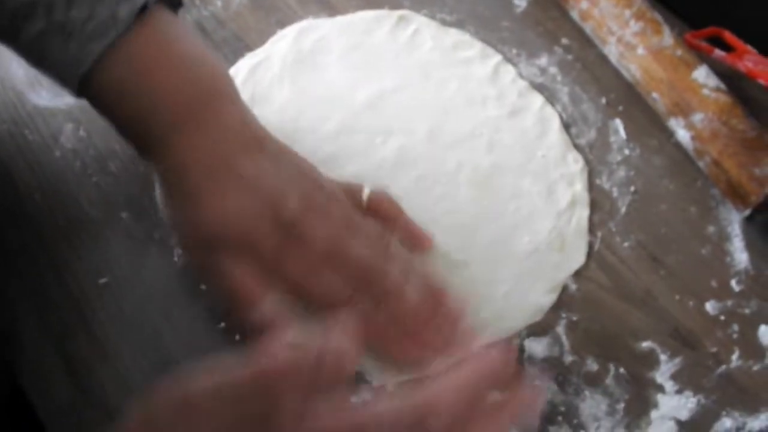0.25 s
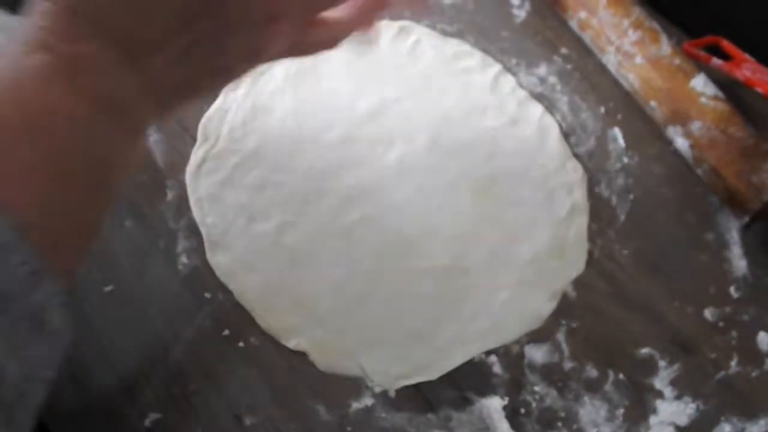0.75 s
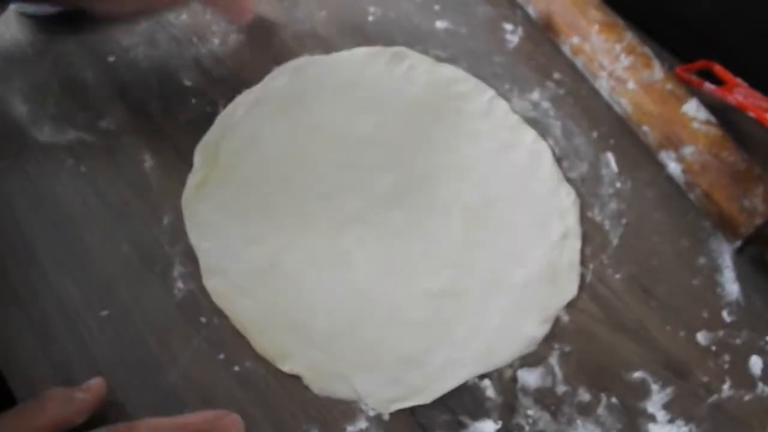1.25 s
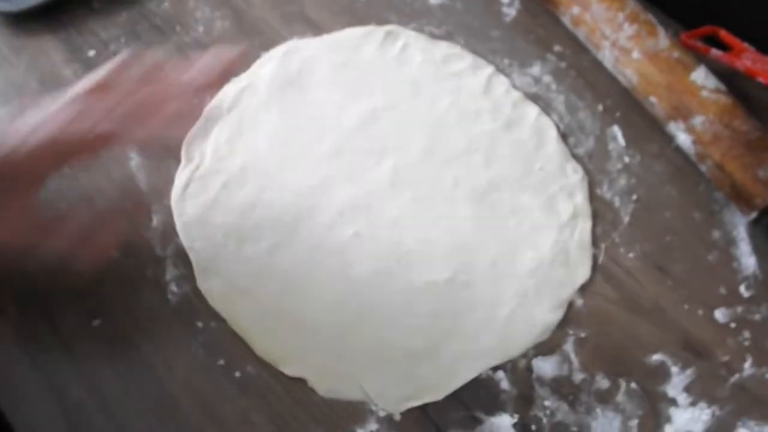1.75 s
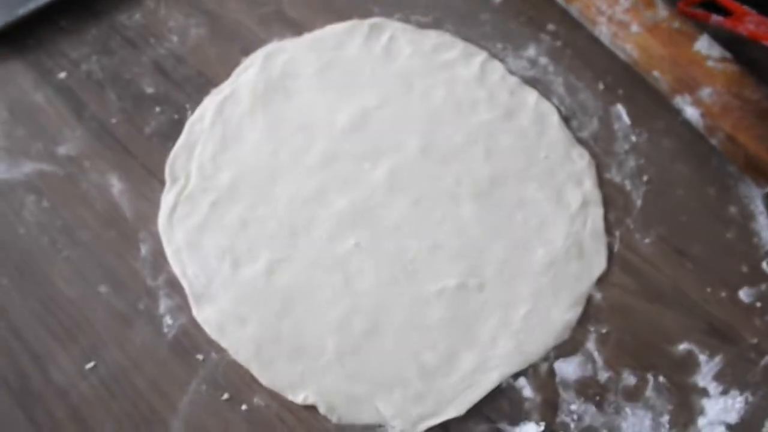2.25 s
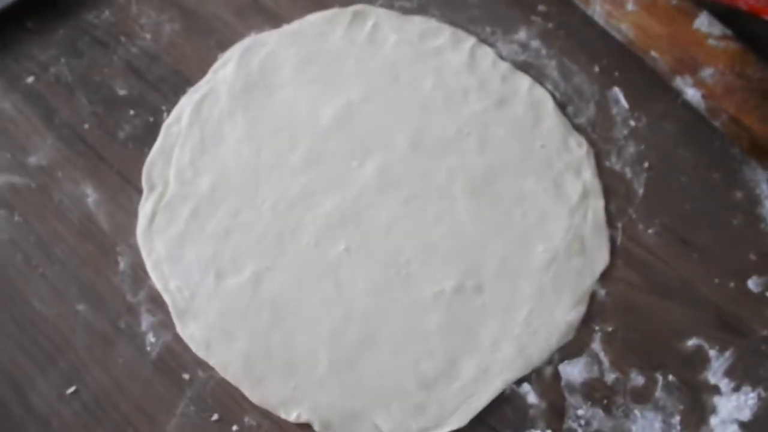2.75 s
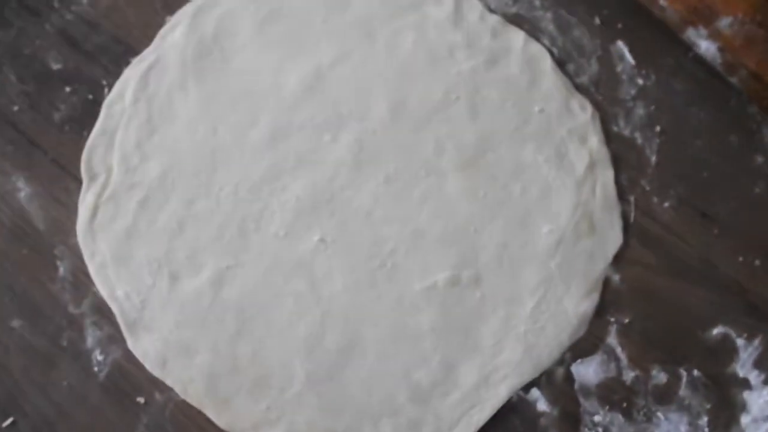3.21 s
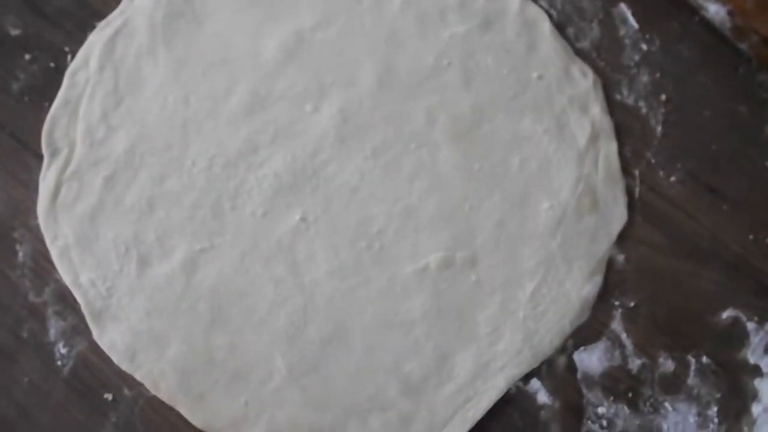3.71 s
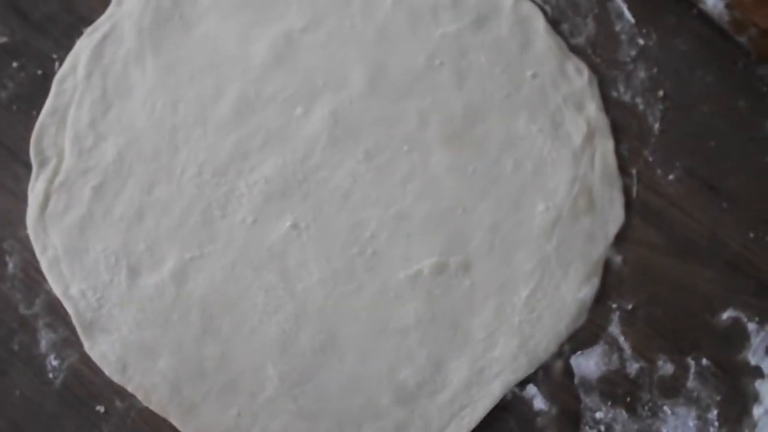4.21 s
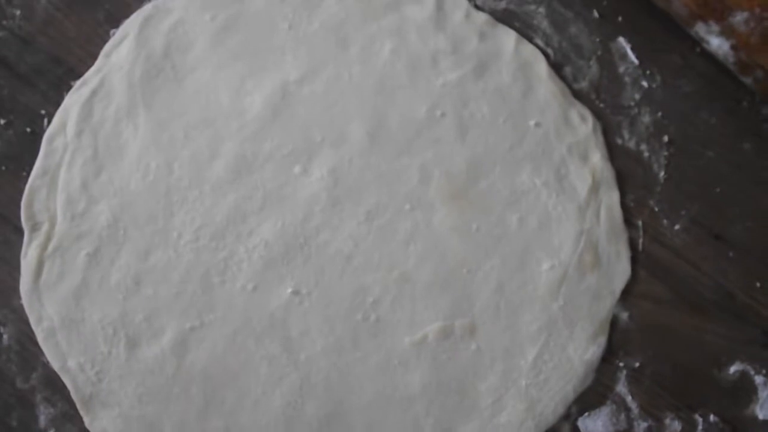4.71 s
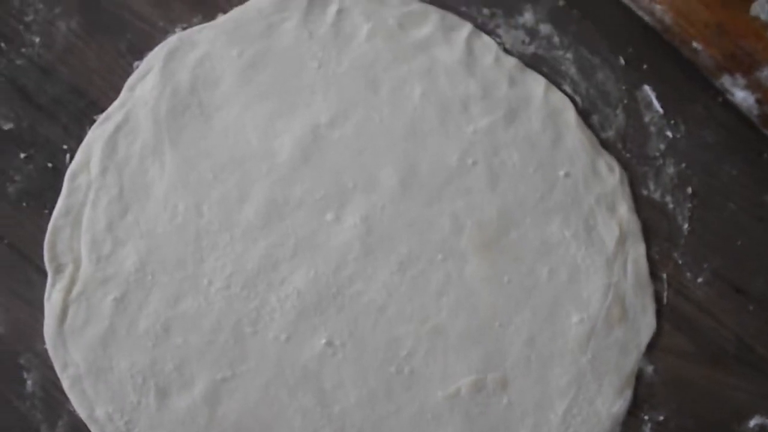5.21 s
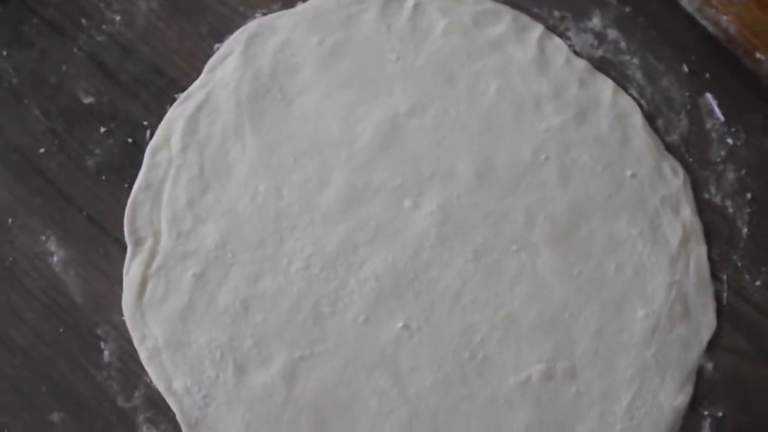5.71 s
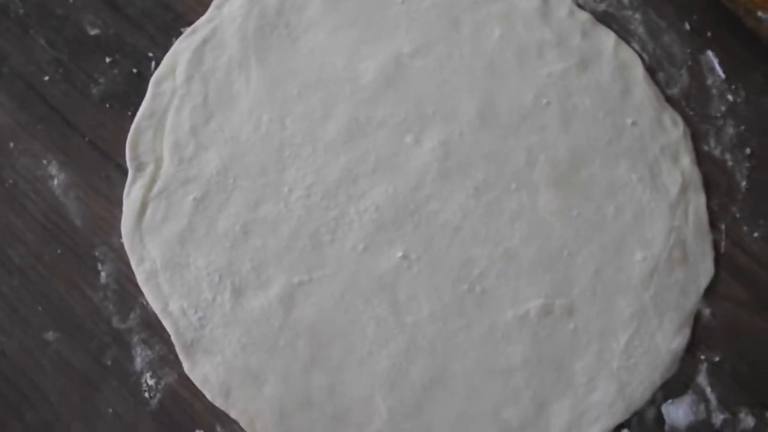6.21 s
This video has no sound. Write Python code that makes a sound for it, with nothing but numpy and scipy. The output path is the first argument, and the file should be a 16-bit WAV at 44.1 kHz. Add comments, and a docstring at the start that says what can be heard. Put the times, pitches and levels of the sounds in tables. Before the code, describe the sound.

One deep, muffled dough pat opens, followed by two brushing palm swishes, a bright clap and a faint second pat. The rest is mostly quiet: cloth rustling, light bumps and rubs on the camera body, tiny squeaks and short low motor pulses heard through the case. A very sharp click rattles at about six seconds. Close, nearly mono microphone, short dull room tail, low rumble and hum.

```python
"""A palm pats dough on a wooden board, the hands brush off flour and clap once, and a softer pat follows.
Sleeves rustle, and fingers bump, slide and squeak on a hand-held camera whose lens motor steps in short runs.
Near the end come a sharp, chattering click and a scrape on the case, over quiet kitchen air, rumble and hum.
Booms and clicks are fading sine waves; rubbing is shaped noise, mostly strongest near 3 kHz like the clicks."""
import sys
import numpy as np
from scipy import signal
from scipy.fft import rfft, irfft
from scipy.io import wavfile

SR = 44100
rng = np.random.default_rng(int(sys.argv[2]) if len(sys.argv) > 2 else 0)


def dump(signal):
    """Clip the signal to [-1, 1] and save it as 16-bit WAV at the path in sys.argv[1]."""
    limited = np.clip(np.atleast_2d(signal).T, -1, 1)
    pcm = np.round(limited * 32767).astype(np.int16)
    wavfile.write(sys.argv[1], SR, pcm)


N = 284884
TIME = np.arange(N) / SR  # seconds

# Pats on the dough. Each row: start in seconds, boom level in dB, ring time as a factor,
# skin slap in dB before doubling, squash of the dough in dB.
PATS = [(0.0431, -8, 1.0, -30, -30.5), (1.102, -28, 0.75, -31, -30)]
# Ways the board and table vibrate. Each row: pitch in Hz, level within the boom in dB,
# time to fade by 60 dB in seconds before the pat's ring factor.
BOARD_MODES = [(46, -22, .2), (72, 0, 0.19), (75.3, -13, 0.55), (96, -8.5, 0.19), (120.4, -14, 0.34),
               (146, -29, 0.11), (312, -25, .15)]
SQUASH_HZ, SQUASH_DECAY_S = 255, 0.026

# Floury palms sliding over each other. Each row: time of the firmest contact in seconds, level in dB,
# build-up in seconds, fade in seconds.
SWIPES = [(0.329, -37.5, 0.0068, 0.0074), (.366, -31.5, 0.011, 0.013), (.479, -15.5, 0.031, 0.03),
          (0.527, -17, 0.016, .025), (0.771, -25, 0.0081, 0.015), (.805, -31.5, 0.012, .042)]

# Claps and clicks. Each row: start in seconds, port ring in dB, bright crack in dB, dull knock in dB,
# ring time as a factor.
CLICKS = [(0.7712, -1, -15, -11, 0.26), (1.215, -40, -34, -60, 0.55), (1.2618, -21, -39, -39, 0.62),
          (1.796, -20, -42, -25.5, 0.44), (6.009, 5, -14.5, -30, 1.12)]
# Chatter of the last click. Each row: delay after it in seconds, port ring in dB.
REBOUNDS = [(.004, -5), (.008, -5), (.013, -4)]
REBOUND_CRACK_DB, REBOUND_KNOCK_DB, REBOUND_RING_FACTOR = -23.5, -31, 1.9
PORT_HZ, PORT_T60_S = 3158, 0.012  # microphone port; each click's ring factor scales the fade
UPPER_PORT_HZ = 4560

# Arm movements that rustle the sleeves. Each row: start in seconds, length in seconds, level in dB.
ARM_MOVES = [(.89, 0.53, -44), (1.44, 0.906, -41.5), (1.85, 0.13, -39), (2.4, 0.21, -41.5),
             (2.74, 0.036, -37), (2.92, 0.28, -42), (3.52, 0.32, -40), (3.86, 0.35, -49), (4.02, 0.26, -38),
             (4.24, 0.58, -31), (4.44, 0.066, -27.5), (4.82, 0.65, -43.5), (5.05, .12, -36),
             (5.47, 0.75, -36), (6.33, 0.22, -38), (6.44, 0.091, -31.5)]
ARM_START_S, ARM_STOP_S = 0.014, 0.02

# Fingers sliding on the camera. Each row: start in seconds, length in seconds, hiss in dB,
# case rumble in dB, top of the rumble in Hz.
SCUFFS = [(2.155, .092, -26, -32, 478), (2.494, 0.08, -31, -44.5, 396), (3.029, 0.12, -29, -43.5, 1050),
          (3.347, .075, -38.5, -49, 500), (3.519, .11, -35, -48.5, 413), (3.784, 0.038, -35.5, -51.5, 1500),
          (4.017, 0.11, -29, -63, 2200), (6.036, 0.14, -24.5, -32.5, 2080),
          (6.107, 0.089, -25.5, -34.5, 1910)]
SCUFF_RISE_SHARE = 0.23  # share of the length

# Fingers landing on the camera. Each row: start in seconds, hiss in dB, case rumble in dB,
# top of the rumble in Hz, decay in seconds.
BUMPS = [(1.262, -43, -45, 2800, .012), (1.309, -35.5, -41, 400, 0.023), (1.498, -40, -33, 1360, 0.039),
         (1.794, -26.5, -45, 1700, .026), (3.026, -27.5, -44.5, 900, 0.017), (5.034, -31, -46, 1800, 0.061),
         (5.584, -25, -44.5, 900, 0.04), (6.009, -19, -26.5, 1680, 0.056)]
BUMP_ATTACK_S = 0.0021
# The grip shifts and jolts the whole camera.
JOLT_S, JOLT_DB, JOLT_HZ, JOLT_DECAY_S = 5.584, -23, 48.3, 0.02
# Resonances of the camera case. Each row: pitch in Hz, width in Hz, gain in dB.
CASE_RESONANCES = [(204, 240, 0.5), (323, 41, 2), (470, 130, -21), (671, 48, 6), (960, 1200, -0.5),
                   (1430, 110, -2.5), (2060, 23, 17.5)]
CASE_LOW_HZ = 65  # bottom of the rumble

# Skin squeaking on the case. Each row: start in seconds, length in seconds, level in dB, starting pitch in Hz.
SQUEAKS = [(3.057, 0.019, -26, 3420), (3.141, 0.026, -25.5, 3320), (3.167, 0.022, -35, 3230),
           (5.586, .029, -19.5, 3300), (5.614, 0.032, -27, 3365)]
SQUEAK_SAG_HZ_PER_S, SQUEAK_WOBBLE_HZ = 11700, 90

# Runs of the lens motor. Each row: start in seconds, length in seconds, low buzz as a share,
# engaging tick in dB before the motor's overall level.
LENS_RUNS = [(3.482, 0.0135, 0.19, -15.5), (4.188, 0.02, 0.75, -23), (4.295, 0.017, 0.77, -24),
             (4.383, 0.021, 0.75, -38), (4.932, 0.021, 0.7, -28), (5.041, 0.018, 1, -24),
             (5.13, 0.022, 0.73, -24), (5.243, 0.022, 0.76, -25)]
LENS_DB = -32
FIRST_STEPS_PER_S, FULL_STEPS_PER_S = 205, 311
SPIN_UP_SHARE = 0.485  # share of the length

# Low hum that comes and goes. Each row: start in seconds, length in seconds, level in dB.
HUMS = [(4.68, 0.35, -44), (5.63, 0.96, -39)]
HUM_HZ, HUM_FADE_S = 54, 0.039

# Spectra: only the shape counts, as the level is set later.
# Hiss of floury palms. Each row: frequency in Hz, relative level in dB per Hz.
PALM_SPECTRUM = [(200, -60), (900, -42), (1500, -35.5), (2200, -24.5), (2750, -13), (3050, -3.5),
                 (3330, -2), (3900, -14.5), (5000, -19.5), (7500, -29.5), (11000, -51), (15500, -52)]
# Finest flour grains. Each row: frequency in Hz, relative level in dB per Hz.
FIZZ_SPECTRUM = [(3500, -12), (5500, -1), (10500, -2), (15500, -12)]
# Rustling cloth and rubbing or slapping skin. Each row: frequency in Hz, relative level in dB per Hz.
CLOTH_AND_SKIN_SPECTRUM = [(200, -43), (900, -26.5), (1500, -19.5), (2100, -14.5), (2650, -9.5),
                           (3000, -3.5), (3270, 1), (3700, -10), (4600, -18), (5500, -26), (8000, -35),
                           (10500, -38.5), (15500, -53)]
# Crack of a snap. Each row: frequency in Hz, relative level in dB per Hz.
CRACK_SPECTRUM = [(1500, -12), (3000, 3), (4700, 2), (6000, -16), (10000, -18), (15500, -30)]
# Still kitchen air. Each row: frequency in Hz, relative level in dB per Hz.
KITCHEN_SPECTRUM = [(53, -53), (90, -8.5), (200, -13), (282, -14), (538, -17), (667, -18.5), (983, -21.5),
                    (1050, -18.5), (1360, -19), (1610, -24), (2230, -17.5), (2540, -20), (3290, -7),
                    (4260, -25.5), (15500, -56.5)]
# Slow rumble. Each row: frequency in Hz, relative level in dB per Hz.
RUMBLE_SPECTRUM = [(4, -11.5), (12, 4.5), (21, 2.5), (30, -36), (52, -7.5), (75, -25), (120, -23),
                   (250, -51)]

EDGE_HZ = 15850  # upper band limit


def amp(db):
    """Turns decibels into gain."""
    return 10 ** (np.asarray(db) / 20)


def unit(x):
    """Scales x to an average (rms) level of 1."""
    return x / np.sqrt(np.mean(x ** 2) + 1e-20)


def add(mix, s, sound):
    """Mixes a sound in at time s, in seconds."""
    part = mix[max(round(s * SR), 0):][:len(sound)]
    part += sound[:len(part)]


def colour(x, spectrum):
    """Filters x by a spectrum, at rms 1; nothing much remains below the first row."""
    hz, db = np.transpose(spectrum)
    f = np.fft.rfftfreq(len(x), 1 / SR) + 1e-3
    gain = amp(np.interp(np.log(f), np.log(hz), db, left=-100))
    return unit(irfft(rfft(x) * gain, len(x)))


def lowpass(x, hz, order=2):
    """Dulls x above hz."""
    return signal.sosfilt(signal.butter(order, min(hz, SR / 2 - 1), fs=SR, output="sos"), x)


def ring(x, hz, width):
    """Passes x through one resonance with a peak gain of 1."""
    return signal.lfilter(*signal.iirpeak(hz, hz / width, fs=SR), x)


def friction(size, grains_per_s, grainy, lumpy_db, lump_hz):
    """Countless tiny slips plus separate larger ones, swelling as the contact pressure changes."""
    fine, pressure, sign = rng.standard_normal((3, size))
    slips = sign * (rng.random(size) < grains_per_s / SR)
    swell = amp(lumpy_db * unit(lowpass(pressure, lump_hz)))
    return unit((fine + grainy * unit(slips)) * swell)


def stroke(size, rise):
    """Loudness of a push that builds over the share rise of its length and then eases off."""
    u = np.linspace(0, 1, size)
    rise = np.clip(rise, .02, .9)
    easing = np.clip((u - rise) / (1 - rise), 0, 1)
    return np.minimum(u / rise, 1) * np.cos(np.pi / 2 * easing) ** 1.2


def held(rows, start_s, stop_s):
    """Gain over time for rows that ease in, hold and ease out; overlaps add in power."""
    power = np.zeros(N)
    for s, length, db in rows:
        ease_in = (1 + np.tanh((TIME - s) / (2 * start_s))) / 2
        ease_out = (1 + np.tanh((s + length - TIME) / (2 * stop_s))) / 2
        power += (amp(db) * ease_in * ease_out) ** 2
    return np.sqrt(power)


def pats():
    """The dough cushions each blow, so the board booms low under a small slap of skin and a dull squash."""
    out, t = np.zeros(N), np.arange(SR // 2) / SR
    for s, db, ring_factor, slap_db, squash_db in PATS:
        boom = sum(amp(mode_db - 60 * t / (t60 * ring_factor)) * np.sin(2 * np.pi * hz * t)
                   for hz, mode_db, t60 in BOARD_MODES)
        soft_start = 1 - np.exp(-t / 0.0042)
        add(out, s, -amp(db) * boom * soft_start)
        slap = colour(rng.standard_normal(len(t)), CLOTH_AND_SKIN_SPECTRUM)
        slap *= np.minimum(t / 0.0037, 1) * np.exp(-t / 0.0081)
        add(out, s - .005, 2 * amp(slap_db) * slap)  # skin touches before the board gives
        squash = unit(lowpass(rng.standard_normal(len(t)), SQUASH_HZ)) * np.exp(-t / SQUASH_DECAY_S)
        add(out, s, amp(squash_db) * squash)
    return out


def palms():
    """Dry flour hisses between the hands as each swipe builds and fades; a light touch keeps more of its fizz."""
    power = np.zeros(N)
    for s, level_db, build, fade in SWIPES:
        away_from_peak = np.maximum((s - TIME) / build, (TIME - s) / fade)
        power += (amp(level_db) * np.exp(-away_from_peak)) ** 2
    press = np.sqrt(power)
    hiss = colour(friction(N, grains_per_s=1000, grainy=0.36, lumpy_db=0.0, lump_hz=119), PALM_SPECTRUM)
    fizz = colour(friction(N, grains_per_s=1000, grainy=0.69, lumpy_db=0.5, lump_hz=60), FIZZ_SPECTRUM)
    return press * hiss + amp(-25.0) * press ** 0.73 * fizz


def snap(db, crack_db, knock_db, ring_factor):
    """A snap rings the microphone port, with a brief bright crack and a dull knock."""
    t = np.arange(SR // 10) / SR
    port = amp(-60 * t / (PORT_T60_S * ring_factor)) * np.sin(2 * np.pi * PORT_HZ * t)
    port *= 1 - np.exp(-t / 0.0001)
    crack = 1.3 * colour(rng.standard_normal(len(t)), CRACK_SPECTRUM)
    crack += 0.6 * np.sin(2 * np.pi * UPPER_PORT_HZ * t)
    crack *= np.exp(-t / 0.0022)
    u = t / 0.0004
    knock = lowpass((1 - u) * np.exp(-u), 4500)  # a push one way, then a smaller one back
    return amp(db) * port + amp(crack_db) * crack - amp(knock_db) * knock


def clicks():
    """The clap and other single snaps; the last one rebounds in a quick chatter."""
    out = np.zeros(N)
    for s, *blow in CLICKS:
        add(out, s, snap(*blow))
    last_s = CLICKS[-1][0]
    for delay, db in REBOUNDS:
        add(out, last_s + delay, snap(db, REBOUND_CRACK_DB, REBOUND_KNOCK_DB, REBOUND_RING_FACTOR))
    return out


def sleeves():
    """Cloth rustles softly for as long as an arm moves."""
    rub = friction(N, grains_per_s=1200, grainy=0.3, lumpy_db=1.5, lump_hz=24.0)
    return held(ARM_MOVES, ARM_START_S, ARM_STOP_S) * colour(rub, CLOTH_AND_SKIN_SPECTRUM)


def finger(size, hiss_db, rumble_db, top_hz):
    """Skin rubbing on the camera hisses in the air and rumbles through the case."""
    rub = friction(size, grains_per_s=600, grainy=0.57, lumpy_db=1.1, lump_hz=128)
    case = 0.48 * rub + sum(amp(db) * ring(rub, hz, width) for hz, width, db in CASE_RESONANCES)
    band = signal.butter(2, np.sort([CASE_LOW_HZ, top_hz]), "bandpass", fs=SR, output="sos")
    rumble = unit(signal.sosfilt(band, case))
    return amp(hiss_db) * colour(rub, CLOTH_AND_SKIN_SPECTRUM) + amp(rumble_db) * rumble


def scuffs():
    """A sliding finger presses harder, then eases off."""
    out = np.zeros(N)
    for s, length, hiss_db, rumble_db, top_hz in SCUFFS:
        size = round(length * SR)
        add(out, s, finger(size, hiss_db, rumble_db, top_hz) * stroke(size, SCUFF_RISE_SHARE))
    return out


def bumps():
    """A landing finger rubs hardest almost at once and comes to rest; one shift of the grip also thuds."""
    out, t = np.zeros(N), np.arange(SR // 5) / SR
    for s, hiss_db, rumble_db, top_hz, decay in BUMPS:
        pressure = np.minimum(t / BUMP_ATTACK_S, 1) * np.exp(-(t / decay) ** 1.08)
        add(out, s, finger(len(t), hiss_db, rumble_db, top_hz) * pressure)
    thud = np.sin(2 * np.pi * JOLT_HZ * t) * np.exp(-t / JOLT_DECAY_S)
    add(out, JOLT_S, amp(JOLT_DB) * thud)
    return out


def squeaks():
    """Skin sticks and slips in a short, unsteady chirp that sags as the finger slows."""
    out = np.zeros(N)
    for s, length, db, start_hz in SQUEAKS:
        t = np.arange(round(length * SR)) / SR
        wobble = SQUEAK_WOBBLE_HZ * unit(lowpass(rng.standard_normal(len(t)), 400))
        hz = start_hz - SQUEAK_SAG_HZ_PER_S * t + wobble
        chirp = np.sin(2 * np.pi * np.cumsum(hz) / SR)
        add(out, s, amp(db) * stroke(len(t), rise=0.37) * chirp)
    return out


def lens():
    """A stepper engages with a tick and spins up; near full speed its fourth harmonic excites the lens barrel."""
    out, t = np.zeros(N), np.arange(SR // 10) / SR
    for s, length, low_share, tick_db in LENS_RUNS:
        spin = np.minimum(t / (SPIN_UP_SHARE * length), 1)
        steps_per_s = FIRST_STEPS_PER_S + (FULL_STEPS_PER_S - FIRST_STEPS_PER_S) * spin
        angle = 2 * np.pi * np.cumsum(steps_per_s) / SR
        running = np.sin(np.pi * np.minimum(t / length, 1)).clip(0) ** 0.093
        buzz = running * (np.sin(angle) + 0.16 * np.sin(2 * angle) + 0.058 * np.sin(3 * angle))
        body = 0.63 * buzz + 0.63 * ring(buzz, 294, 30)  # the case hums on for a moment
        barrel = ring(running * spin ** 3 * np.sin(4 * angle), 1360, 300)
        knock = lowpass(ring(rng.standard_normal(len(t)), 580, 1200), 1300, order=4)
        tick = unit(knock * np.exp(-t / 0.0081))
        add(out, s, amp(LENS_DB) * (low_share * body + barrel + amp(tick_db) * tick))
    return out


def room(x, t60, top_hz):
    """Kitchen walls return a short, dull tail: fading noise stands in for many echoes."""
    t = np.arange(SR // 2) / SR
    tail = lowpass(rng.standard_normal(len(t)), top_hz) * amp(-60 * t / t60) * (t > .005)
    return signal.fftconvolve(x, tail / np.linalg.norm(tail))[:N]


def background():
    """Still kitchen air and a slow rumble are shaped noise; a low sine hum wavers in level."""
    air, rumble, waver = rng.standard_normal((3, N))
    hum = unit(np.sin(2 * np.pi * HUM_HZ * TIME)) * amp(0.73 * unit(lowpass(waver, 6.7)))
    steady = amp(-45.5) * colour(air, KITCHEN_SPECTRUM) + amp(-38.5) * colour(rumble, RUMBLE_SPECTRUM)
    return steady + held(HUMS, HUM_FADE_S, HUM_FADE_S) * hum


def scene():
    """All sources are close and central; above the mono bass, the left channel lags the right by one sample."""
    near = pats() + palms() + clicks() + sleeves() + scuffs() + bumps() + squeaks()
    without_bass = near - lowpass(near, 170, order=1)
    walls = amp(-14.5) * room(without_bass, t60=0.18, top_hz=6060)
    right = near + walls + lens() + background()  # the motor is heard only through the case
    left = np.append(0, right[:-1])
    above_bass = signal.butter(2, 330, "highpass", fs=SR, output="sos")
    side = signal.sosfiltfilt(above_bass, (left - right) / 2)
    return (left + right) / 2 + np.array([side, -side])


def record(dry):
    """The input overloads by clipping peaks beyond full scale; then a filter removes the highest treble."""
    edge = signal.firwin(511, EDGE_HZ, window=("kaiser", 9), fs=SR)
    return signal.oaconvolve(np.clip(dry, -1, 1), edge[None], "same", axes=1)


dry = scene()
out = record(dry)
dump(out)
```